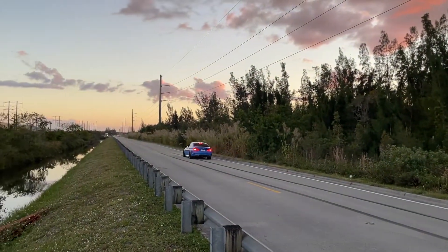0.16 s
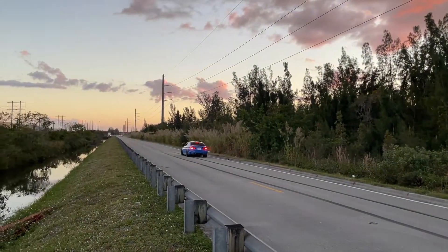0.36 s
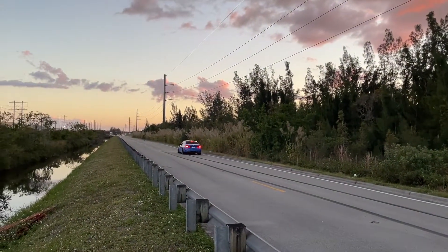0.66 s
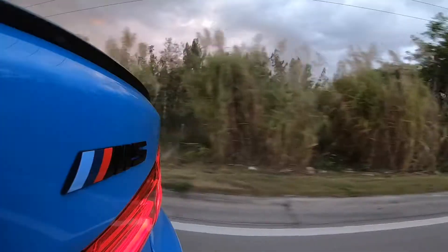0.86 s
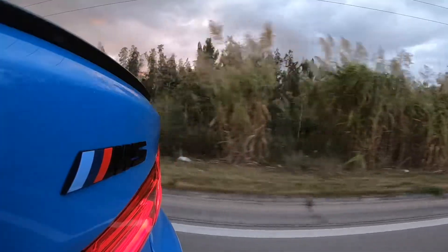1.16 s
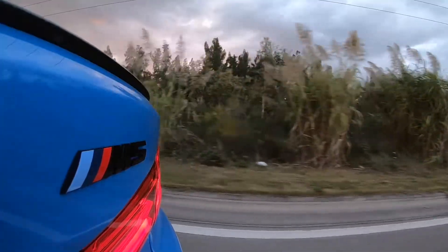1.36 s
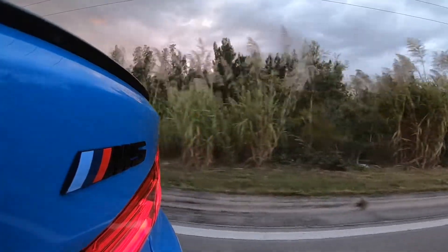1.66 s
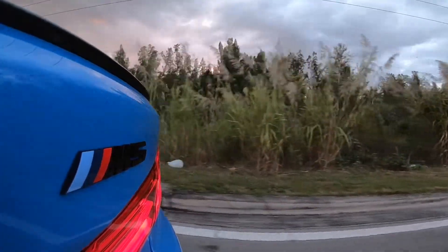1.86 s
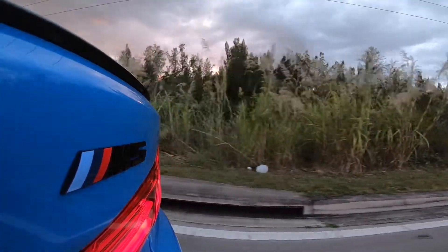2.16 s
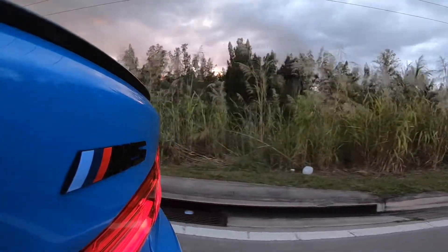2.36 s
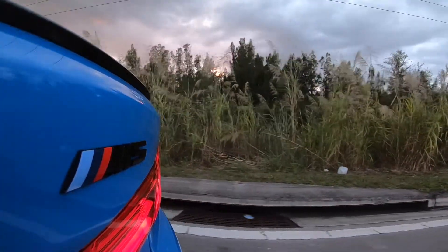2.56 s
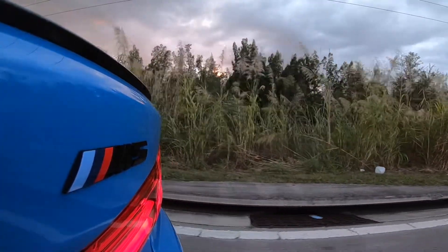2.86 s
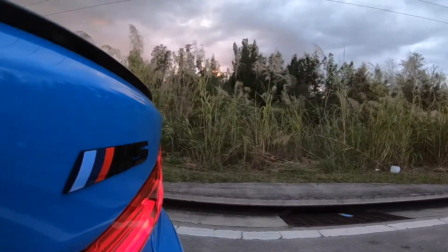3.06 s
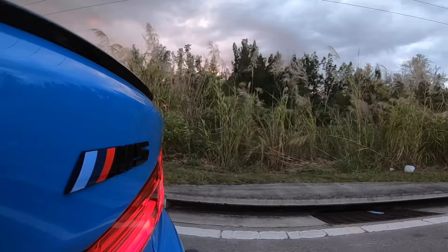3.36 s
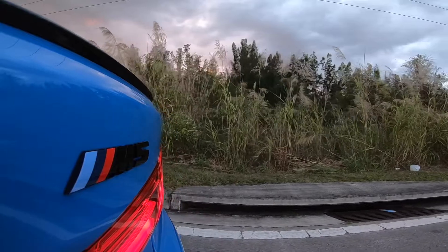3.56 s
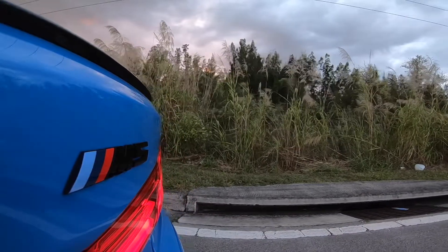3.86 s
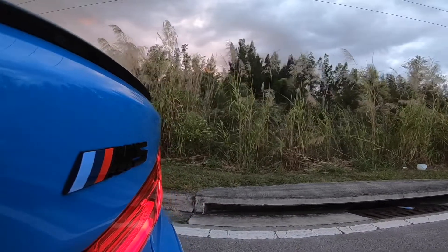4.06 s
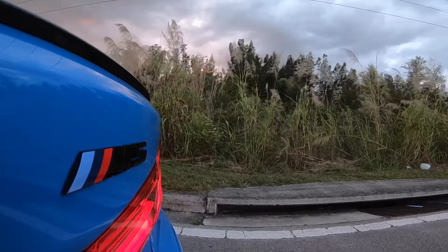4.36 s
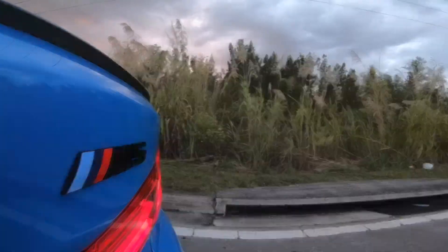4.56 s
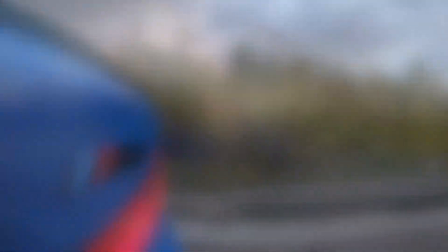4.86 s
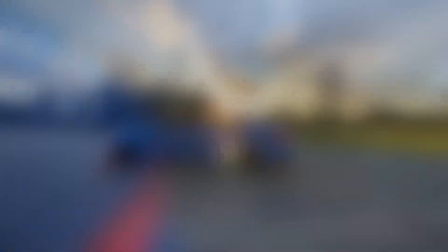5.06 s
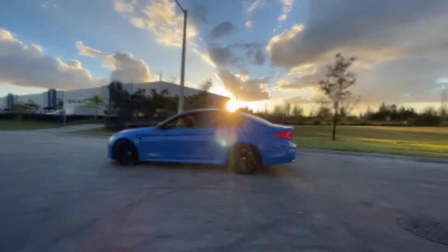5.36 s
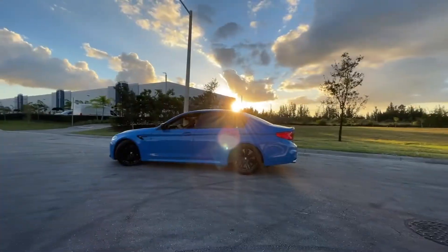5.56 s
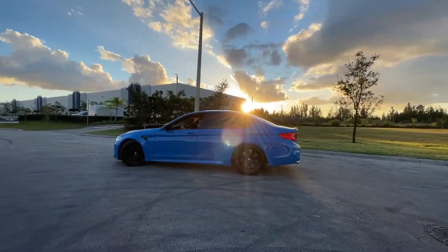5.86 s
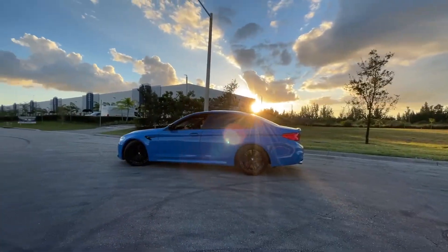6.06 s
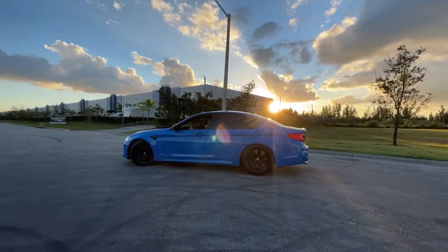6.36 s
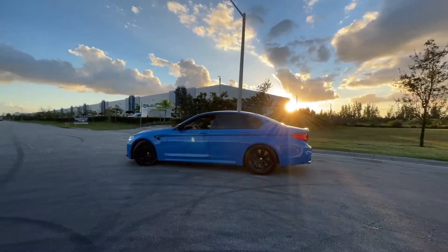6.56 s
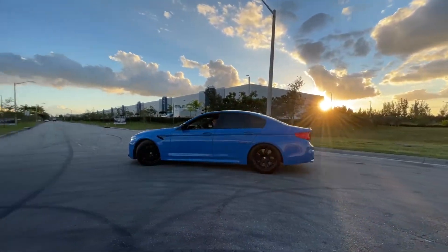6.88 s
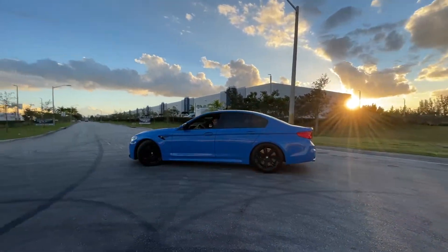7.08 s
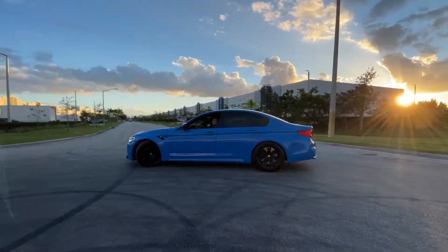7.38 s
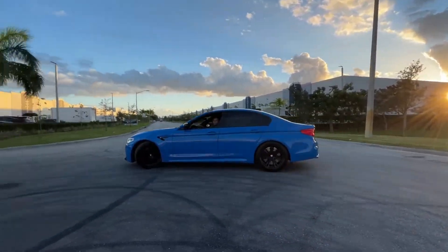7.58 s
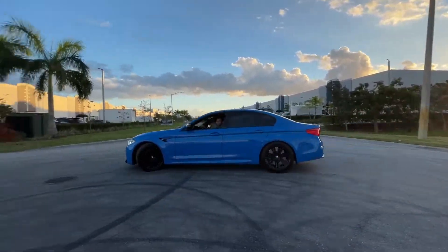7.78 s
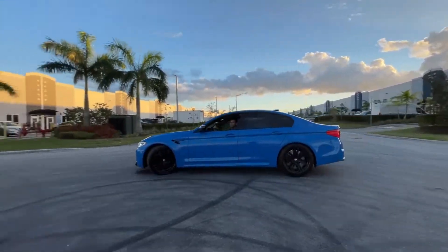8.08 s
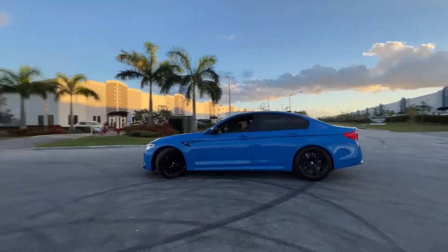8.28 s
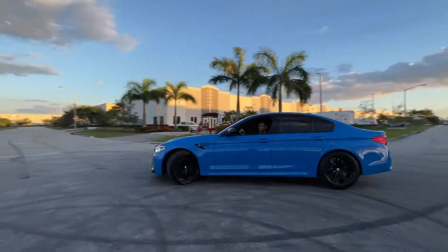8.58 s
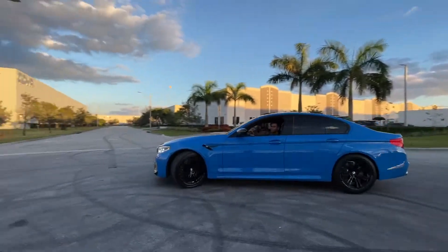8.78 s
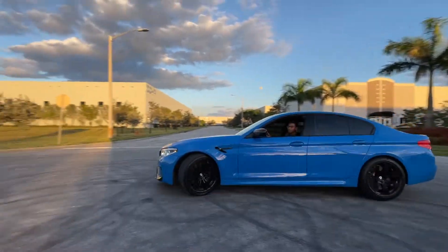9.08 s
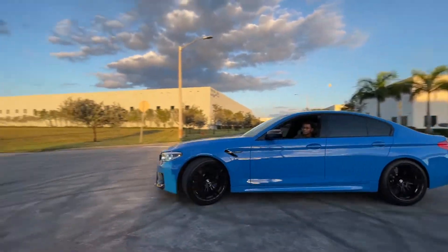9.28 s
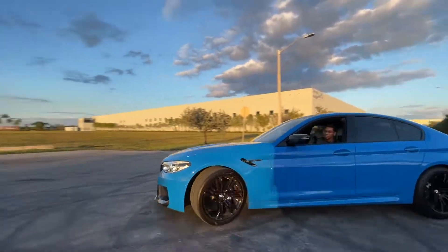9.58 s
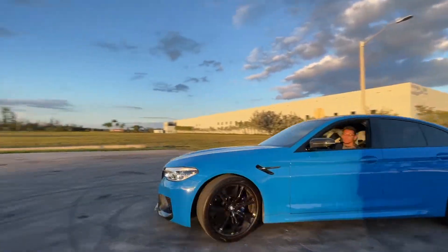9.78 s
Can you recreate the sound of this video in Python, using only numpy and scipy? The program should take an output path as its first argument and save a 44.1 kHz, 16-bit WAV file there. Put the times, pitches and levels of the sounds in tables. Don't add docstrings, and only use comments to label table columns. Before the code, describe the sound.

From 0 to 0.85 s a turbo V8 pulls away on an open road, a moderately distant smooth drone with airy exhaust rush, its pitch dipping and rising at a gear change. A quick cut puts a mono microphone at the tailpipe: throttle stabs and a loud raspy blip peak around 1.1-1.3 s, then ragged, hollow pops crackle from 1.4 to 2.05 s as revs fall. Duller burbles and faint metal ticks follow to about 2.9 s, leaving a deep, throbbing, loping idle. Between 4.4 and 5.8 s it dissolves into wide handheld stereo on a paved lot, with low idle and faint insect chirring. Revs climb from 5.8 s, roaring hardest about 8-8.8 s and surging unevenly. Tyres begin squealing near 8 s, then shriek in wavering bites, with scrub, stone snaps and lift-off thumps, closest at the abrupt end near 9.9 s.

```python
import sys
import numpy as np
from scipy import signal
from scipy.fft import rfft, irfft, next_fast_len
from scipy.io import wavfile
from scipy.ndimage import uniform_filter1d, map_coordinates

SR = 44100
rng = np.random.default_rng(int(sys.argv[2]) if len(sys.argv) > 2 else 0)


def field_ratio(decibels):
    return 10 ** (np.asarray(decibels, dtype=float) / 20)


def transcribe(u):
    v = np.clip(np.atleast_2d(u).T, -1, 1)
    q = np.round(v * 32767).astype(np.int16)
    wavfile.write(sys.argv[1], SR, q)


N = 437913
T = np.arange(N) / SR
FFT_SIZE = next_fast_len(N + SR // 4)
F = np.maximum(np.fft.rfftfreq(FFT_SIZE, 1 / SR), 1)


def unit(x):
    return x / np.sqrt(np.mean(x ** 2))


def curves(table):
    s, *cols = np.transpose(table)
    return [np.interp(T, s, c) for c in cols]


def over_hz(table):
    hz, value = np.transpose(table)
    return np.interp(np.log(F), np.log(hz), value)


def shape(x, gain):
    return irfft(rfft(x, FFT_SIZE) * gain, FFT_SIZE)[:N]


def peak(hz, width, f=F):
    return 1 / (1 + 1j * (f - hz ** 2 / f) / width)


def slew(x, s):
    size = int(s * SR)
    return uniform_filter1d(uniform_filter1d(x, size), size)


def walk(rate):
    k = int(SR / rate)
    held = np.repeat(rng.standard_normal(N // k + 1), k)
    return unit(uniform_filter1d(uniform_filter1d(held, k), k)[:N])


def sine(turns):
    return np.sqrt(2) * np.sin(2 * np.pi * turns)


def band(hz, width):
    noise = rng.standard_normal(N) + 1j * rng.standard_normal(N)
    p = np.exp(-np.pi * width / SR)
    envelope = signal.lfilter([1], [1, -2 * p, p * p], noise)
    return unit((envelope * np.exp(2j * np.pi * np.cumsum(hz) / SR)).real)


def ring(x, modes):
    out = 0
    for hz, db, t60 in modes:
        pole = np.exp(2j * np.pi * hz / SR - np.log(1000) / (t60 * SR))
        out = out + field_ratio(db) * signal.lfilter([1], [1, -pole], x).imag
    return out


def bursts(starts_s, heights, fade_s):
    return sum(h * np.exp(-np.maximum(T - s, 0) / fade_s) * (T >= s) for s, h in zip(starts_s, heights))


def ripple(ripple_db, width):
    size = int(width / (F[-1] - F[-2]))
    noise = rng.standard_normal(len(F))
    return field_ratio(ripple_db * unit(uniform_filter1d(uniform_filter1d(noise, size), size)))


def pedal(stabs):
    return slew(sum(depth * ((T >= a) & (T < b)) for a, b, depth in stabs), 0.0061)


def lope(hz, crest_s, db, start, end):
    idling = slew(1. * ((T > start) & (T < end)), 0.12)
    return db * np.cos(2 * np.pi * hz * (T - crest_s)) * idling


def levels(drive, pipe, hiss, throttle=0, gains_db=(0, 0, 0, 0, 0)):
    hz, flow_db = curves(drive)
    speeds, *cols = np.transpose(pipe)
    slope, offset_db = hiss
    shut = [np.interp(hz, speeds, c) for c in cols]
    shut += [flow_db, slope * flow_db + offset_db]
    return [hz] + [db + gain * throttle for db, gain in zip(shut, gains_db)]


def gas_colour(colour, modes):
    resonances = sum((field_ratio(db) - 1) * abs(peak(f, w)) ** 2 for f, w, db in modes)
    return field_ratio(over_hz(colour)) * (1 + resonances) * ripple(1.8, 40)


# firing_multiple, level_db (against the boom)
LUMPS = [(0.251, -17), (.375, -4), (.5, 1.5), (.625, -2.5), (.75, -1.5), (1.249, -3), (1.5, -1.5)]
# pitch_hz, width_hz, level_db
BOOM = [(68.1, 18, 0), (82.7, 50, 1)]


def engine(table, colours, rings, load_db, split_hz, rough_db, gate, flutter_db, sing=(), count=2):
    hz, tone_db, octave_db, boom_db, gas_db, hiss_db = table
    turns = np.cumsum(hz * (1 + .004 * walk(25))) / SR

    def tone(k):
        return field_ratio(rough_db * hz / 100 * walk(18)) * sine(k * turns + rng.random())

    lumps = sum(field_ratio(db + 2.1 * walk(12)) * abs(peak(85, 25, k * hz)) * tone(k) for k, db in LUMPS)
    fired = np.diff(np.floor(turns), prepend=0) * rng.standard_normal(N) / np.sqrt(hz)
    silencer = sum(field_ratio(db) * peak(f, w) ** 2 for f, w, db in BOOM) / (1 + (F / 200) ** 4)
    boom = unit(shape(fired, silencer))
    boom_db = boom_db - 14 * abs(peak(76.4, 41, hz)) ** 2
    low = field_ratio(tone_db) * tone(0.99)
    low = low + field_ratio(octave_db) * (tone(2) + field_ratio(-22.0) * tone(3))
    low = low + field_ratio(boom_db) * (field_ratio(1.0) * boom + lumps)
    low = low + sum(field_ratio(tone_db + db) * abs(peak(f, w, k * hz)) ** 2 * tone(k) for k, f, w, db in sing)

    puffs = 1 + np.clip(gate * hz / 250, 0, 1) * np.cos(2 * np.pi * turns)
    load = np.clip((gas_db - load_db) / 8, 0, 1)
    treble = 1 / (1 + (split_hz / F) ** 8)
    gas = field_ratio(gas_db + flutter_db * walk(11))
    hiss = field_ratio(hiss_db + flutter_db * walk(8.5))
    rush = 0
    for colour, modes, share in zip(colours, rings, (1 - load, load)):
        gain = gas_colour(colour, modes)
        layers = []
        for noise in puffs * rng.standard_normal((count, N)):
            body = unit(shape(noise, gain * np.sqrt(1 - treble)))
            top = unit(shape(noise, gain * np.sqrt(treble)))
            layers.append(gas * body + hiss * top)
        rush = rush + np.sqrt(share) * np.array(layers)
    return low + rush[0], rush[-1]


# start_s, firing_hz, gas_flow_db
ROAD = [
    (0, 282.7, -33),
    (.18, 266.2, -34),
    (.75, 203.4, -39.5),
    (.9, 226.8, -35),
]
# firing_hz, tone_db, octave_db, boom_db
ROAD_PIPE = [(200, -37, -55, -37), (280, -38.5, -60.5, -34)]
ROAD_GAS = 2 * [[(71, -64.0), (120, -24), (147, -13), (220, -8.0), (323, -20.5), (412, -22.5), (546, -19.5),
            (1440, -21), (2000, -27.5), (3100, -37), (3400, -44.5), (4800, -45.0), (6960, -49.0),
            (8690, -64), (10000, -48.5), (15000, -58.5)]]
ROAD_RING = 2 * [[(317, 13, 11.5)]]


def road_engine():
    return engine(levels(ROAD, ROAD_PIPE, hiss=(1, -28.5)), ROAD_GAS, ROAD_RING,
                  load_db=0, split_hz=4000, rough_db=0.5, gate=0.22, flutter_db=0.0)


def roadside_hum():
    return field_ratio(-38 + 3 * walk(9.3)) * sine(164 * T)


# start_s, hiss_lift_db
PUFFS = [(1.074, 15.5), (1.41, 12), (1.535, 14), (1.63, 1), (1.66, 7.5), (1.763, 13), (1.892, 4),
         (2.005, 5), (2.115, 9), (2.335, 12)]


def puff():
    starts_s, lifts_db = np.transpose(PUFFS)
    return slew(bursts(starts_s, lifts_db, fade_s=0.009), 0.0065)


def flare():
    starts_s, peaks_db, _ = np.transpose(POPS)
    full_stab_db = -12
    return np.clip(bursts(starts_s, field_ratio(peaks_db - full_stab_db), fade_s=0.0083), 0, 1)


# start_s, firing_hz, gas_flow_db
TAIL = [(.84, 228, -29.5), (1.05, 220, -32), (1.1, 230, -25.5), (1.17, 256, -20.5), (1.26, 281, -21),
        (1.32, 283.4, -24.5), (1.46, 259.4, -34.5), (1.63, 225.4, -38), (1.89, 200, -41.5),
        (2.08, 162.5, -45.5), (2.26, 136.8, -46), (2.35, 112, -42.5), (2.64, 81.8, -48.5),
        (2.9, 68.43, -46), (3.0, 65.7, -49), (3.16, 57, -51), (3.81, 55.4, -46), (4.19, 52, -45.5),
        (4.49, 47.6, -44.5)]
# open_s, shut_s, depth (0-1)
TAIL_STABS = [
    (.9, .99, 0.08),
    (.99, 1.07, 0.55),
    (1.1, 1.29, 0.89),
    (1.39, 1.48, 0.6),
    (2.09, 2.31, 0.53),
]
# firing_hz, tone_db, octave_db, boom_db
TAIL_PIPE = [(48, -22, -14.5, -24.5), (52, -16.5, -18.5, -26.5), (57, -17.5, -28.5, -26.5),
             (59.6, -13, -43, -35), (65.3, -12.5, -44, -28), (75.3, -15.5, -48.5, -15),
             (85, -21, -34.5, -12), (112, -31.5, -42, -18), (144, -24.5, -47.5, -29.5),
             (160, -29.5, -57, -32), (190, -19.5, -61, -22), (230, -26.5, -50.5, -25),
             (282, -35, -60.5, -18)]
# pitch_hz, level_db (per Hz)
TAIL_GAS = [(88, -20.5), (150, -10), (189, -12.5), (264, -13.5), (312, -16.5), (421, -17), (522, -23),
            (1500, -39), (2950, -48), (4200, -55), (8000, -81), (10400, -102), (17600, -120)], [(180, -4.5),
            (300, -3), (412, -8.5), (565, -7.5), (618, -16), (811, -8), (987, -20.5), (1650, -24),
            (2850, -33), (3100, -36.5), (11000, -61.5), (14300, -98.5), (22000, -120)]
# pitch_hz, width_hz, gain_db
TAIL_RING = [(390, 3.7, 2.1), (840, 21, 2.8)], [(851, 72, 10.2), (1270, 180, 7.6), (1594, 130, 6.9)]
# firing_multiple, pitch_hz, width_hz, level_db (against the firing tone)
TAIL_SING = [(3, 815, 70, -8.5)]


def tail_engine():
    burning = slew(np.maximum(pedal(TAIL_STABS), flare()), .005)
    open_db = (15.9, 14, 3.9, 5, 3.1)
    hz, tone_db, octave_db, boom_db, gas_db, hiss_db = levels(TAIL, TAIL_PIPE, (0.84, -25.5), burning, open_db)
    swell_db = lope(hz=5.7, crest_s=3.57, db=2, start=3.1, end=4.2)
    table = hz, tone_db + swell_db, octave_db + 0.9 * swell_db, boom_db, gas_db, hiss_db + puff()
    return engine(table, TAIL_GAS, TAIL_RING, load_db=-46.5, split_hz=1870, rough_db=1.6, gate=0.14,
                  flutter_db=-0.5, sing=TAIL_SING, count=1)[0]


def pump_whine():
    return field_ratio(-58) * sine(np.cumsum(422 + 1.5 * walk(3)) / SR)


# start_s, level_db
SHAKE = [
    (2.2, -40),
    (2.9, -44.5),
    (3.3, -35),
    (4.6, -22),
    (5.2, -24),
]


def body_shake():
    return field_ratio(curves(SHAKE)[0]) * band(36 + 0 * T, 32)


# start_s, peak_db, thump_db
POPS = [(1.106, -26.5, -24), (1.394, -26.5, -5), (1.408, -24, -19), (1.435, -27, -19.5),
        (1.4915, -10, -3.5), (1.516, -21, -5), (1.532, -13.5, -8), (1.555, -21, -24.5), (1.569, -15, -8.5),
        (1.629, -15.5, -9.5), (1.634, -10.5, -18.5), (1.659, -18, -3.5), (1.675, -16.5, -22.5),
        (1.762, -14.5, -2.5), (1.769, -14.5, -21), (1.779, -18.5, -22.5), (1.891, -17, -4.5),
        (1.9, -16, -19.5), (1.912, -22, -8), (1.947, -28.5, -24), (2.004, -20, -4.5), (2.026, -23, -27),
        (2.038, -19, -3.5), (2.12, -38.5, -33.5), (2.181, -35.5, -34), (2.325, -33.5, -17.5),
        (2.355, -31, -24.5), (2.374, -34, -25), (2.395, -31.5, -18.5), (2.42, -31.5, -25.5),
        (2.505, -40, -15), (2.59, -40.5, -24.5), (2.94, -46, -30)]
# pitch_hz, level_db, t60_s
PIPE = [(73.4, 3.5, 0.14), (98, -19.5, 0.083), (199, -7.5, 0.077)]
# pitch_hz, level_db, t60_s
CRACK = [(411, 3.5, 0.051), (521, 8.5, 0.028), (600, 11.5, 0.012), (822, 6.5, 0.027), (940, -4.5, 0.0088),
         (1100, -6.5, 0.032), (1305, -4.5, 0.02), (1630, -3, 0.006), (2150, -12.5, 0.025),
         (2414, -10, 0.02), (3050, -14, 0.013)]


def pops():
    thump, crack = np.zeros(N), np.zeros(N)
    t = np.arange(2000) / SR
    burn = (1 - np.exp(-t / 0.001)) * (np.exp(-t / 0.0043) + 0.28 * np.exp(-t / 0.022))
    draws = rng.standard_normal((len(POPS), 2, 2000))
    for (s, peak_db, thump_db), (ragged, chance) in zip(POPS, draws):
        i = int(s * SR)
        thump[i] = field_ratio(thump_db + 1.0)
        scatter = field_ratio(1.5 * unit(slew(chance, .0012)))
        crack[i:i + 2000] += field_ratio(peak_db - 29.5) * burn * ragged * scatter
        crack[i + 30] -= field_ratio(peak_db - 21.5)
    bright = shape(ring(crack, CRACK), peak(900, 1400) / (1 + (F / 3600) ** 8))
    muffled = shape(bright, field_ratio(7) / (1 + (F / 520) ** 3))
    dull = np.interp(T, (1.7, 2.5), (0, 1))
    return shape(ring(thump, PIPE), peak(160, 270)) + (1 - dull) * bright + dull * muffled


def burble(table, hz, t60):
    push = np.zeros(N)
    for s, db in table:
        push[int(s * SR)] = field_ratio(db)
    return shape(ring(push, [(hz, 0, t60)]), peak(hz, 63) ** 2)


# start_s, level_db
TAIL_BURBLE = [(1.3, -7), (1.345, -11.5), (1.42, -10), (2.33, -4), (2.43, -11.5), (2.5, -6), (2.58, -13.5),
               (2.655, -10.5)]


def tail_burble():
    return burble(TAIL_BURBLE, hz=65.2, t60=0.36)


def ticks(table):
    out, t = np.zeros(N), np.arange(400) / SR
    for (s, db, hz, *spread), tick in zip(table, rng.standard_normal((len(table), 400))):
        wide = max(spread[0], 1.05) if spread else 1.6
        b, a = signal.butter(2, (hz / wide, min(hz * wide, SR * .45)), "bandpass", fs=SR)
        i = int(s * SR)
        out[i:i + 400] = field_ratio(db - 4) * unit(signal.lfilter(b, a, tick)) * np.exp(-t / 0.0035)
    return out


# start_s, peak_db, pitch_hz
TICKS = [(1.35, -52, 5940), (1.633, -60, 7000), (1.765, -56, 4960), (2.006, -58, 5950), (2.3448, -54, 4460),
         (2.43, -66, 5970), (2.508, -54, 1350), (2.61, -71, 2500), (2.94, -50, 1100), (2.9994, -58, 7980)]


def tail_ticks():
    return ticks(TICKS)


# start_s, level_db
SPIN = [(7.76, -55.5), (7.8, -36), (7.9, -31), (8.12, -28), (8.33, -39.5), (8.43, -61), (8.63, -31),
        (8.7, -27), (8.83, -40), (9.05, -34.5), (9.12, -31.5), (9.3, -32), (9.43, -37), (9.52, -31.5),
        (9.6, -39), (9.67, -33), (9.93, -30.5)]


def wheelspin():
    return field_ratio(curves(SPIN)[0] + 1.4 * walk(16))


# start_s, firing_hz, gas_flow_db
LOT = [(4.6, 48, -38), (5.7, 48, -38.5), (5.96, 57.44, -40), (6.43, 86.75, -34.5), (6.61, 100.1, -32.5),
       (6.93, 91.7, -35.5), (7.36, 107, -33), (7.74, 125.4, -29), (7.87, 146.2, -23), (8.03, 190, -19.5),
       (8.24, 225.8, -17.5), (8.37, 198.4, -18), (8.46, 184.2, -21), (8.6, 240.5, -15.5),
       (8.69, 261.1, -22.5), (8.83, 223.4, -19.5), (8.98, 179.4, -20), (9.21, 182.4, -24.5),
       (9.65, 122.6, -20.5), (9.8, 159.5, -24.5)]
# open_s, shut_s, depth (0-1)
LOT_STABS = [(5.8, 5.99, 0.53), (5.99, 7.48, 0.77), (7.48, 7.73, 0.44), (7.73, 8.19, 0.65),
             (8.19, 8.36, 0.88), (8.48, 8.56, 0.76), (8.56, 8.72, 0.82), (8.72, 8.83, 0.64),
             (9.04, 9.3, 0.79), (9.67, 9.86, 1), (9.86, 9.9, .6)]
# firing_hz, tone_db, octave_db, boom_db
LOT_PIPE = [(48, -32.5, -23.5, -28), (61.7, -26, -60.5, -35), (71, -20.5, -73, -26),
            (90.6, -21, -49, -33.5), (101.8, -24.5, -39.5, -33.5), (129.3, -33.5, -33, -26),
            (140, -31, -32.5, -23.5), (171.4, -33, -50.5, -26.5), (192, -27.5, -37.5, -31),
            (200, -25.5, -44, -23.5), (220, -26, -43.5, -28), (247, -22.5, -64, -29.5),
            (272, -26.5, -60, -36)]
# start_s, level_db
TURN = [
    (9.3, 1.5),
    (9.42, -8),
]


def circling():
    open_db = (14.66, 17.7, 7.1, 3.3, 3.2)
    hz, tone_db, octave_db, boom_db, gas_db, hiss_db = levels(
        LOT, LOT_PIPE, (0.72, -21.5), pedal(LOT_STABS), open_db)
    turn_db = curves(TURN)[0]
    octave_db = octave_db + lope(hz=5.8, crest_s=5.53, db=3.5, start=5.2, end=5.85) + 1.2 * turn_db
    hiss = np.hypot(field_ratio(hiss_db), wheelspin())
    return hz, tone_db, octave_db, boom_db + turn_db, gas_db + 0.34 * turn_db, 20 * np.log10(hiss)


# pitch_hz, level_db (per Hz)
LOT_GAS = [(130, -15.5), (220, 1.5), (236, -8), (455, -15), (616, -10.5), (685, -14), (1090, -15),
           (1420, -28), (2550, -35.5), (2990, -45.5), (5000, -44.5), (7520, -56.5), (8520, -55),
           (12800, -58), (15300, -58.5)], [(180, 1), (300, 1), (570, -5), (629, -7.5), (694, -9.5),
           (1100, -5), (1360, -8.5), (2420, -20.5), (3660, -32.5), (5000, -26), (6830, -29), (7540, -40),
           (13000, -37), (15300, -62)]
# pitch_hz, width_hz, gain_db
LOT_RING = [(630, 2, 9.5), (8660, 420, 7.5), (5640, 570, -15), (7440, 400, -13), (10000, 1200, -3),
            (6940, 270, 3)], [(631.5, 18.6, 18), (768, 260, 9), (5580, 490, -13), (10200, 1600, -0.5),
            (6800, 330, 2)]
# firing_multiple, pitch_hz, width_hz, level_db (against the firing tone)
LOT_SING = [(2, 423, 25, -11.5), (3, 590, 44, -8.5), (4, 800, 55, -17.5)]


def lot_engine():
    return engine(circling(), LOT_GAS, LOT_RING, load_db=-31.0, split_hz=2107, rough_db=0.05, gate=0.25,
                  flutter_db=0.4, sing=LOT_SING)


def panel_hum():
    gas_db = circling()[4]
    return field_ratio(gas_db - 17 + 2.5 * walk(14)) * band(626.6 + 6 * walk(4.6), 13)


# start_s, pitch_hz, level_db
INSECTS = [
    (5.0, 8000, -75),
    (5.2, 8100, -53.5),
    (5.45, 7950, -54),
    (5.6, 8060, -66),
    (5.85, 8100, -59),
    (6.0, 8100, -66),
    (6.4, 8030, -73),
]


def insects():
    hz, db = curves(INSECTS)
    return field_ratio(db + 3 * walk(35)) * band(hz, 220)


# start_s, peak_db, pitch_hz, spread_factor
GRIT = [(5.035, -46, 4000, 2.2), (5.21, -56, 8700, 1.15), (5.29, -55, 8900, 1.3), (5.336, -44, 13500, 1.3),
        (5.5344, -41, 6100, 1), (5.703, -50, 9500, 1.5), (5.8703, -33, 7100, 2.2), (6.1388, -41, 7000, 2),
        (7.25, -46, 6050, 1.8), (7.36, -47, 6000, 2), (7.858, -39.5, 10000, 1.5), (8.6736, -30, 3500, 1.6),
        (8.927, -22, 3500, 1.6), (9.1297, -28, 2600, 1.6), (9.153, -28.5, 2760, 1.6),
        (9.371, -34.5, 9500, 1.6), (9.447, -34, 4500, 1.5), (9.847, -17, 1050, 1.3)]


def grit():
    return ticks(GRIT)


# start_s, squeal_hz, scrub_db
SLIDE = [(7.5, 1100, -72.5), (8.2, 1129, -46), (8.43, 1075, -29.5), (8.66, 1076, -22.5), (8.76, 1047, -30),
         (8.84, 1048, -36), (9.0, 1062, -25.5), (9.07, 1082, -31), (9.13, 1093, -20.5), (9.25, 1093, -23),
         (9.38, 1131, -29.5), (9.53, 1072, -21.5), (9.66, 1089, -26), (9.93, 1023, -20.5)]
# pitch_multiple, width_hz, level_db
SCRUB = [(.72, 256, -9.5), (1.42, 340, 4.5), (1.8, 467, -19), (2.2, 500, -5), (2.8, 700, -17)]
# start_s, gain_db
BITES = [(8.19, 6.5), (8.45, 4), (8.62, 8.5), (8.86, 7), (9.14, 8.5), (9.398, 10.5), (9.62, 9), (9.85, 9.5)]
# start_s, tilt_db (per multiple)
TILT = [(8.6, -6), (9.3, -11.5), (9.65, -7.5), (9.9, 13.5)]
# start_s, pitch_hz, level_db
NEAR = [(8.9, 1503, -64), (9.2, 1480, -24), (9.35, 1450, -36), (9.48, 1480, -27), (9.6, 1507, -49),
        (9.7, 1504, -22), (9.77, 1605, -23), (9.82, 1404, -31), (9.88, 1477, -21.5), (9.93, 1650, -24)]


def tyres():
    hz, scrub_db = curves(SLIDE)
    tilt_db = curves(TILT)[0]
    bite_db = sum(db * np.exp(-((T - s) / 0.094) ** 2) for s, db in BITES)
    squeal_db = -28 + np.interp(T, (7.5, 8.1), (-15, 0)) + bite_db
    squeal = field_ratio(squeal_db + 2.0 + 1.1 * walk(25)) * band(hz * (1 + 0.042 * walk(16)), 120)
    scrub = 0
    for k, width, db in SCRUB:
        mode_db = db + tilt_db * np.minimum(2.0 - k, 2.2 * k - 1.8) + 2.9 * walk(14)
        scrub = scrub + field_ratio(mode_db) * band(k * hz * (1 + 0.03 * walk(4.5)), width)
    near_hz, near_db = curves(NEAR)
    chirp = field_ratio(near_db + 2.2 * walk(30)) * band(near_hz * (1 + .02 * walk(20)), 130)
    sliding = np.interp(T, (7.3, 7.5), (0, 1))
    return sliding * (squeal + field_ratio(scrub_db - 5.5) * scrub + chirp)


# start_s, level_db
BURBLE = [(7.79, -16.5), (8.372, 2.5), (8.458, -16), (8.762, -6), (8.806, 1), (8.96, -6), (9.018, -3.5),
          (9.289, -10), (9.555, -4.5), (9.662, -10)]


def lift_off_burble():
    return burble(BURBLE, hz=87.2, t60=0.12)


# start_s, lag_samples
LAG = [(0, -2), (.9, -1), (4.4, -6), (5.7, -8), (6.3, -8), (6.8, -6), (7.46, -6), (7.53, 10), (8.2, 11),
       (8.7, 15), (9.2, 16), (9.9, 17)]
# pitch_hz, share (0-1)
LIKENESS = [(60, .98), (150, .95), (350, .92), (700, .8), (1500, .9), (3000, .75), (5000, .6), (9000, .55),
            (11900, .6), (12500, 1)]
# pitch_hz, level_db
LEFT_DB = [(40, 0), (100, -1.2), (300, -2.2), (600, 1), (1200, .3), (2500, 3), (5000, 4.3), (9000, 0)]


def ports(direct, scattered):
    like = np.clip(over_hz(LIKENESS), 0, 1)
    shared = 1 / (1 + (12100 / F) ** 40) + 1 / (1 + (F / 480) ** 4)
    moving = shape(direct, np.sqrt(like) * (1 - shared))
    common = shape(direct, np.sqrt(like) * shared)
    wet = shape(scattered, np.sqrt(1 - like))
    lag = curves(LAG)[0]
    pair = []
    for side in (1, -1):
        late = map_coordinates(moving, [T * SR - side * lag / 2], mode="mirror")
        diffuse = map_coordinates(wet, [T * SR - side * SR // 40], order=0, mode="mirror")
        pair.append(shape(late + common + diffuse, field_ratio(side * over_hz(LEFT_DB) / 2)))
    return np.array(pair)


def scene():
    cut = np.interp(T, (0.827, 0.895), (0, 1))
    dissolve = np.sin(np.interp(T, (4.41, 5.82), (0, np.pi / 2))) ** 2
    tail_fade = cut * np.cos(np.interp(T, (4.41, 5.42), (0, np.pi / 2)))
    road, road_far = road_engine()
    hum = roadside_hum()
    tail = tail_engine() + pump_whine() + body_shake() + pops() + tail_burble() + tail_ticks()
    lot, lot_far = lot_engine()
    lot = lot + panel_hum() + insects() + grit() + tyres() + lift_off_burble()
    direct = (1 - cut) * (road + hum) + dissolve * lot
    direct = shape(direct, 1 / (1 + (42 / F) ** 4))
    scattered = (1 - cut) * road_far + dissolve * (lot_far + tyres())
    return ports(direct, scattered) + tail_fade * tail


def low_pass(x):
    return signal.sosfilt(signal.butter(12, 15600, fs=SR, output="sos"), x)


def record(dry):
    rounded = np.tanh(dry)
    lowpass = signal.butter(8, 14500, fs=SR, output="sos")
    return low_pass(signal.sosfilt(lowpass, rounded))


dry = scene()
out = record(dry)
transcribe(out)
```